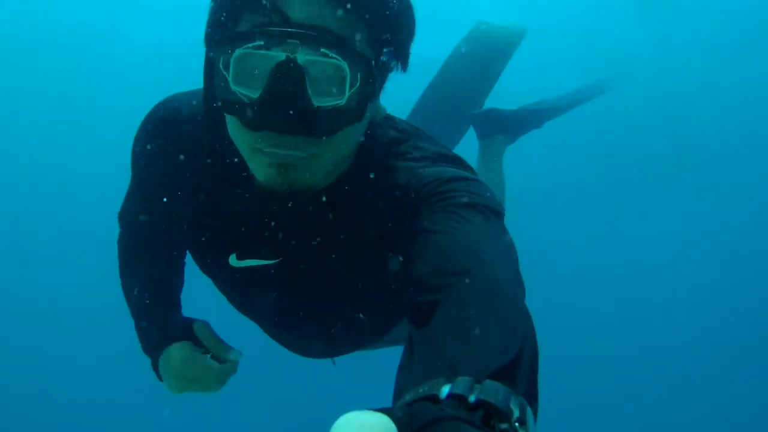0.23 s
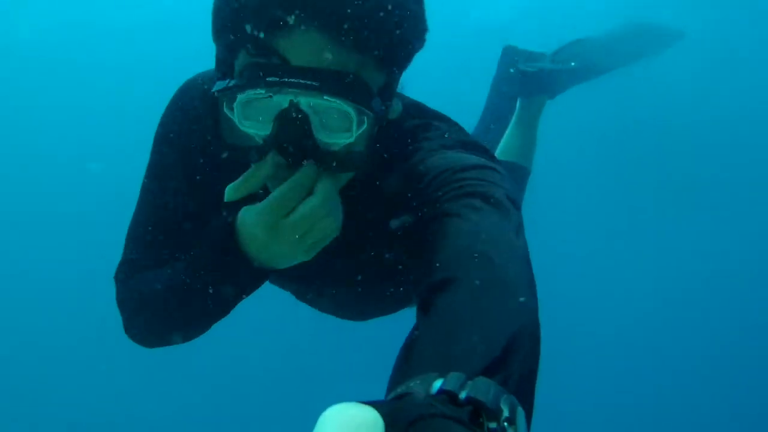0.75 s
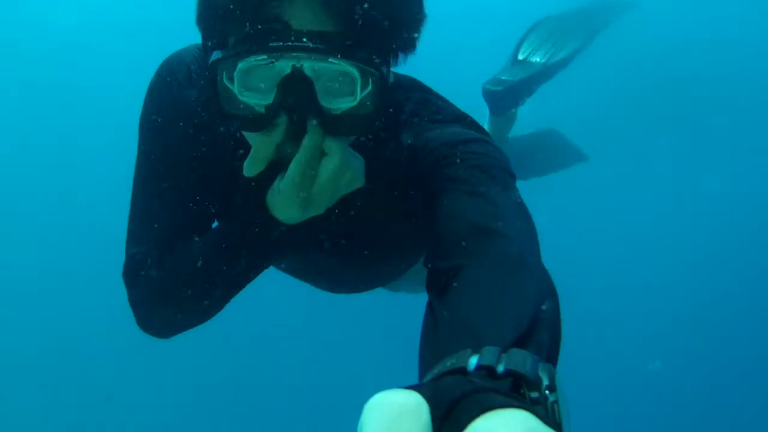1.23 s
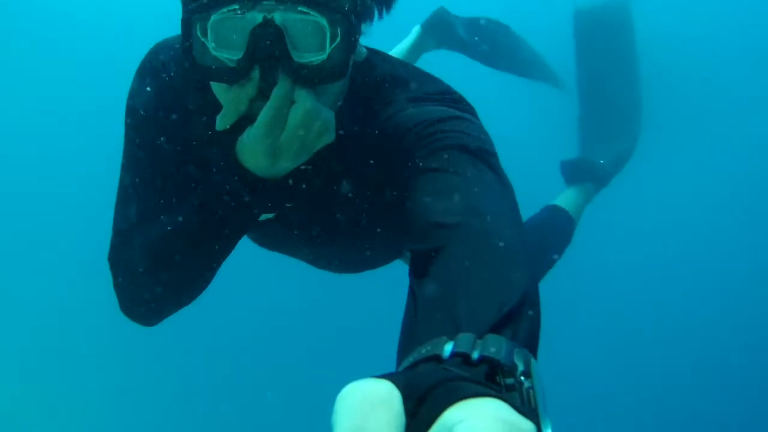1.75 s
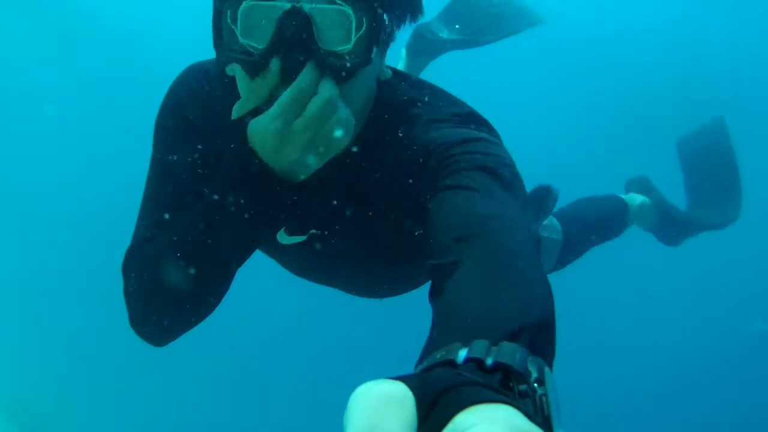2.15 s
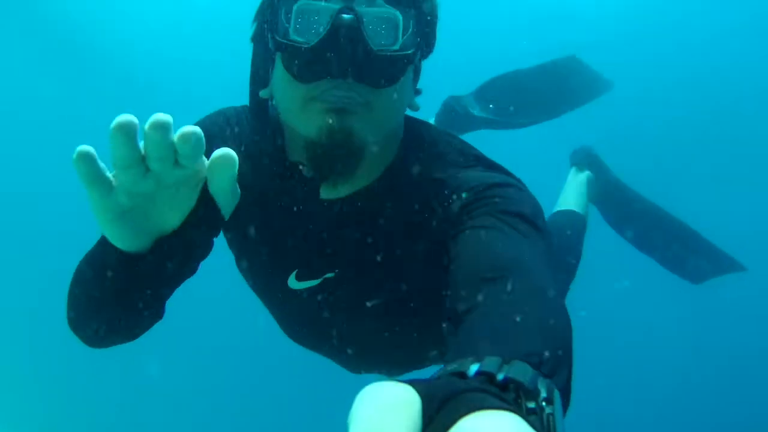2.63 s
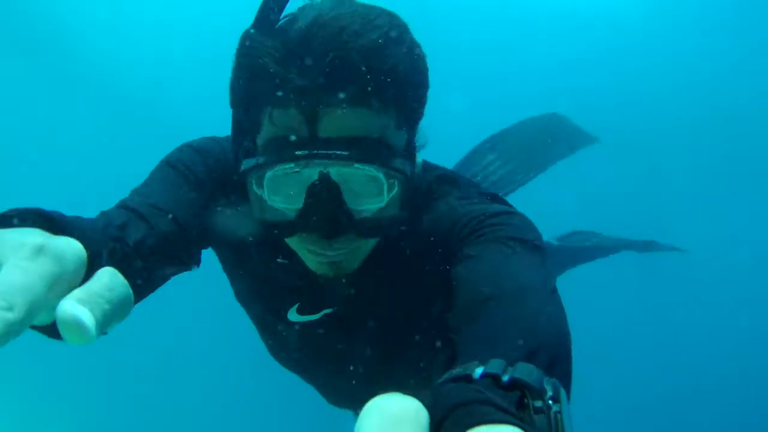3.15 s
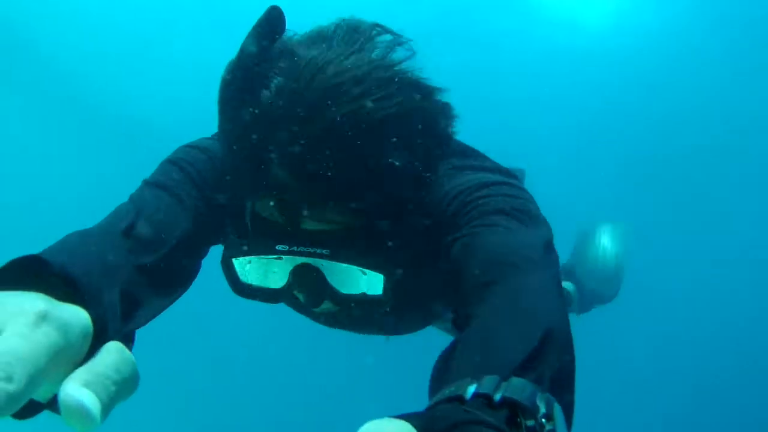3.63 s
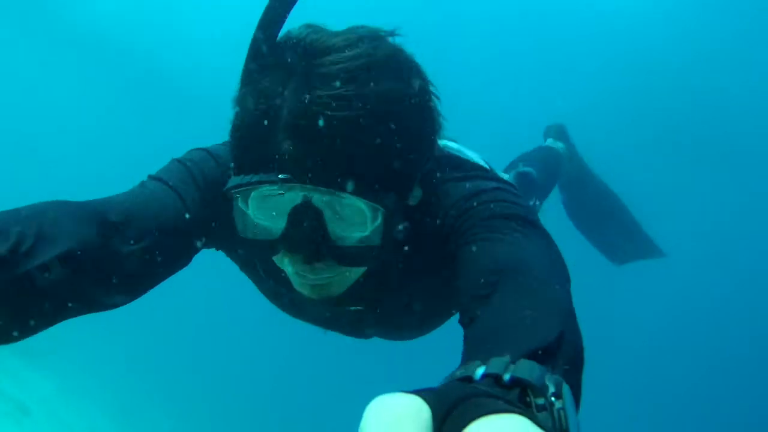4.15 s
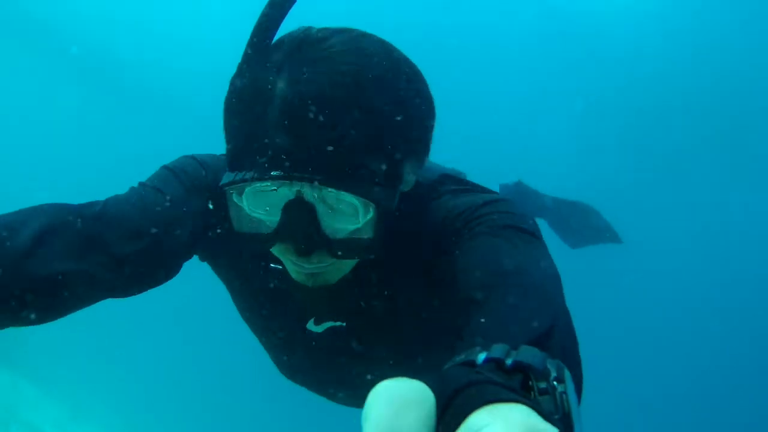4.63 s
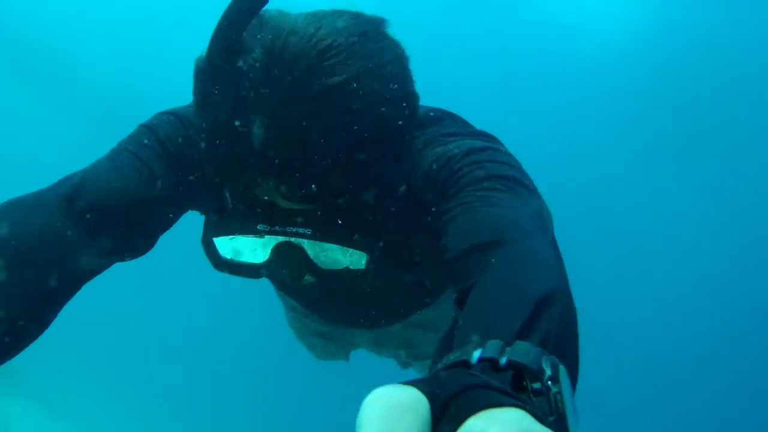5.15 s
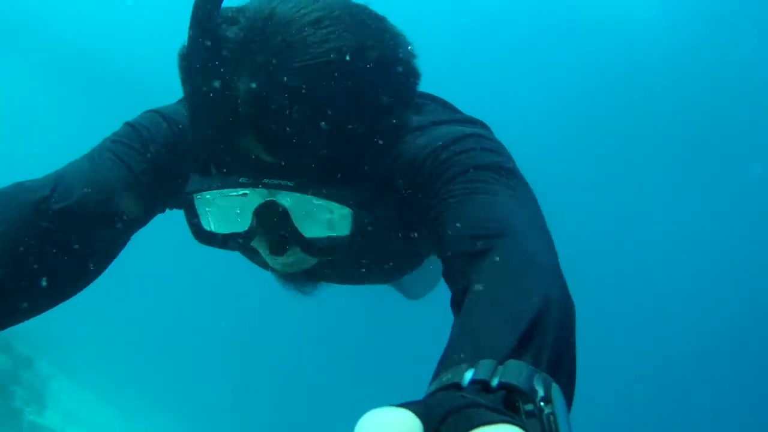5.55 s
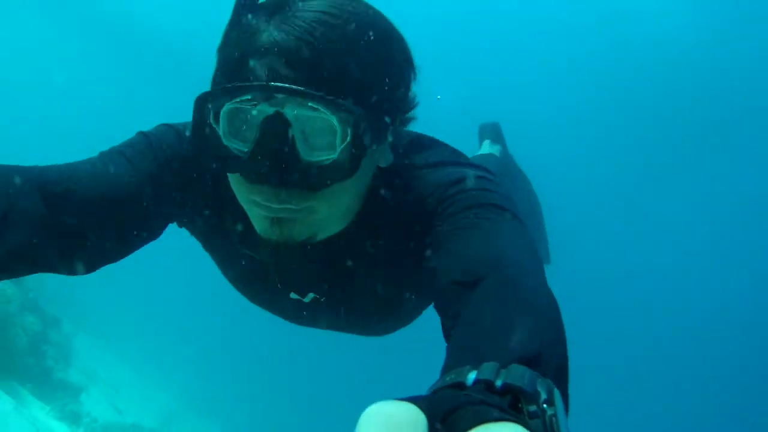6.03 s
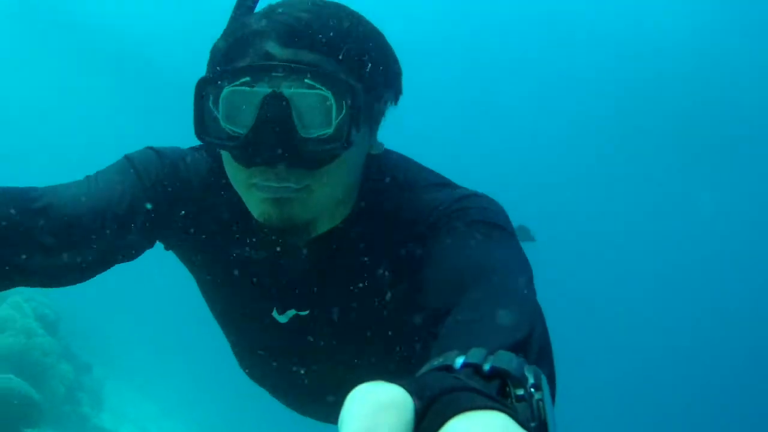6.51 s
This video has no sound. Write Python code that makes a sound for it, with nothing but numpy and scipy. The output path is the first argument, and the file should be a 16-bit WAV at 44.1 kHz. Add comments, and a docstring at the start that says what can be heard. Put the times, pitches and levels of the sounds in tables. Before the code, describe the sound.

Underwater, a microphone sealed in a hollow camera case picks up a swimming freediver. A deep, uneven rumble runs throughout, with slow sway and soft throbbing thumps; over it lie muffled lapping, fine flickering fizz, smooth hiss and a very faint high whine. Sharp dry snaps and tiny bubble blips scatter irregularly, with brighter snaps near 0.5 and 3.6 s. From 0.8 to 1.9 s, short sloshes and cushioned knocks accompany the hand. Around 2.05 s a tiny falling gurgle precedes knocks and a thump at 2.3 s. Flow swells from 2.5 to 4 s, with sloshes at 3.0 and 3.8 s, then eases. At 5.7 s it surges again; a second gurgle at 5.8 s leads into the loudest dull knock at 5.9 s, further knocks and a brief grip creak until about 6.2 s. The rumble then eases, with a few crisp ticks to the end near 7 s.

```python
"""A low watery rumble under a fine fizz, a smooth hiss and a faint whine: a camera in a waterproof
housing, held by a freediver finning through open water. Eddies (filtered noise and short pulses) buffet
the case; sloshes, lapping and microbubbles (grains through resonators) burble and fizz. Knocks (damped
sines), sharp snaps, probably reef shrimp (filtered spikes), and tiny bubbles (chirped sines) tick over
this; trapped air gurgles twice (falling harmonics) and the hand rubs the grip once (stick-slip pulses)."""
import sys
import numpy as np
from scipy import signal
from scipy.fft import rfft, irfft
from scipy.io import wavfile
from scipy.ndimage import uniform_filter1d

SR = 44100
rng = np.random.default_rng(int(sys.argv[2]) if len(sys.argv) > 2 else 0)


def waveform_to_disk(signal):
    """Save audio, clipped to [-1, 1], as 16-bit WAV at the path in sys.argv[1]."""
    frames = np.transpose(np.atleast_2d(signal))
    scaled = np.clip(frames, -1, 1) * 32767
    samples = np.round(scaled).astype(np.int16)
    wavfile.write(sys.argv[1], SR, samples)


N = 298998
T = np.arange(N) / SR  # time of each sample, s


def undb(db):
    """Level as a logarithm: decibels to amplitude gain."""
    return 10 ** (np.asarray(db) / 20)


def unit(x):
    """Normalisation: scale to standard deviation 1."""
    return x / np.std(x)


def curves(table):
    """Linear interpolation: each column after the first as a line through time."""
    s, *columns = np.transpose(table)
    return [np.interp(T, s, column) for column in columns]


def add(out, s, sound):
    """Superposition: mix a sound in at a given time."""
    i = int(s * SR)
    out[i:i + len(sound)] += sound[:max(N - i, 0)]


def response(points, size=16384):
    """Minimum phase: the causal impulse response of a spectrum, by folding its cepstrum."""
    hz, db = np.transpose(points)
    f = np.maximum(np.fft.rfftfreq(size, 1 / SR), 1)
    gain = undb(np.interp(np.log(f), np.log(hz), db))
    gain = gain * np.minimum(hz[-1] / f, 1) ** 2  # a further 12 dB per octave past the last point
    cepstrum = irfft(np.log(gain))
    cepstrum[1:size // 2] *= 2
    cepstrum[size // 2 + 1:] = 0
    return irfft(np.exp(rfft(cepstrum)))


def colour(x, points):
    """Linear filtering: pass a sound through a spectrum, then scale it to rms 1."""
    return unit(signal.fftconvolve(x, response(points))[:N])


def resonate(x, hz, q):
    """Resonance: a single mode driven by x, with gain 1 at its pitch."""
    return signal.lfilter(*signal.iirpeak(hz, q, fs=SR), x)


# resonances of the case and the air inside it: pitch_hz [Hz], width_hz [Hz], lift_db [dB, each alone]
HOUSING_MODES = [(516.5, 47.5, 7.5), (557, 47.4, 6.5), (826, 30, 5), (1096, 83, 13), (1628, 56, 15),
                 (1904, 100, 11)]


def housing(x):
    """Sympathetic resonance: the case and its air ring along with whatever reaches them."""
    for hz, width_hz, lift_db in HOUSING_MODES:
        x = x + (undb(lift_db) - 1) * resonate(x, hz, hz / width_hz)
    return x


def walk(rate):
    """Random drift: smoothed random steps, so many a second, with spread near 1."""
    k = int(SR / rate)
    steps = np.repeat(rng.standard_normal(N // k + 1), k)
    return unit(uniform_filter1d(steps, k)[:N])


def grains(rate, spread_db):
    """Poisson-like shot noise: random tiny impulses, so many a second, most weak and a few strong."""
    sizes = undb(spread_db * np.minimum(rng.exponential(size=N), 5))
    struck = rng.random(N) < rate / SR
    return unit(struck * sizes * rng.choice([-1, 1], N))


def steady(x, hold_s):
    """Gain levelling: hold a random sound at rms 1 over a short time."""
    return x / np.sqrt(uniform_filter1d(x ** 2, int(hold_s * SR)))


def eddy_pressure(points, hold_s):
    """Turbulent pressure: coloured noise, held at even strength over a few turns."""
    return steady(colour(rng.standard_normal(N), points), hold_s)


def swells(table, rise=0.24):
    """Energy addition: events that build up for a share (rise) of their length, then fade."""
    power = 0
    for s, length, db in table:
        power = power + np.interp(T, [s, s + rise * length, s + length], [0, undb(db), 0]) ** 2
    return np.sqrt(power)


# speed of the water past the case, as the level of the sway it causes: time_s [s], level_db [dB]
FLOW_SPEED = [(0, -40.5), (.55, -38), (.8, -43), (1.9, -41.5), (2.2, -35.5), (2.7, -32), (3.55, -30.5),
              (4.3, -34.5), (5.3, -37.5), (5.75, -32), (6.2, -31.5), (6.6, -36.5)]
# spectra of slow sway and of faster buffeting: frequency_hz [Hz], density_db [dB per Hz, relative]
SWAY_SPECTRUM = [(4, -19), (9, 0), (18, 7.5), (25, -9), (33, -6), (48, -11.5), (65, -24.5), (100, -53)]
BUFFET_SPECTRUM = [(30, -34), (55, -4), (75, 1.5), (98, 2), (120, -5.5), (150, -13.5), (200, -33.5),
                   (350, -62)]
# trains of small eddies: start_s [s], length_s [s], level_db [dB, at the height]
EDDY_TRAINS = [(.25, 0.19, -47.5), (.66, .2, -46.5), (1.2, 0.28, -46.5), (3.1, 0.37, -46),
               (3.97, 0.22, -41), (5.19, 0.083, -45), (5.38, 0.13, -45)]


def rumble(buffet_db=-53.5, buffet_law=0.72, surge_db=4.0, eddy_hz=91, eddy_width_hz=31):
    """Flow noise: the stream sways and buffets the case in surges; eddy trains make it throb and fade."""
    flow_db = curves(FLOW_SPEED)[0]
    sway = eddy_pressure(SWAY_SPECTRUM, hold_s=0.23) * undb(flow_db)
    # buffet_db holds at the mean flow before the surges; buffet_law is dB per dB of flow
    level_db = buffet_db + buffet_law * (flow_db - flow_db.mean()) + surge_db * walk(14)
    buffet = eddy_pressure(BUFFET_SPECTRUM, hold_s=.07) * undb(level_db)
    throb = resonate(eddy_pressure(BUFFET_SPECTRUM, hold_s=0.052), eddy_hz, eddy_hz / eddy_width_hz)
    return sway + buffet + steady(throb, hold_s=0.061) * swells(EDDY_TRAINS)


def microbubbles(q=6.6, count=14):
    """Bubble resonance: many sizes pop independently, each ringing a few cycles at its own pitch."""
    fizz = 0
    for hz in np.geomspace(1500, 9500, count):
        pops = grains(rate=160, spread_db=2.5)
        fizz = fizz + unit(resonate(pops, hz, q)) * np.sqrt(hz)
    return fizz


# fizz on the case wall, before its flicker: time_s [s], level_db [dB]
FIZZ_LEVEL = [(0.0, -61), (0.49, -74.5), (0.87, -74.5), (1.7, -66.5), (2.4, -73), (3.19, -64.5),
              (4.66, -72), (4.97, -67.5), (5.36, -74), (6.27, -70), (6.44, -76), (6.78, -70.5)]
# spectra of lapping and of fizz: frequency_hz [Hz], density_db [dB per Hz, relative]
MURMUR_SPECTRUM = [(90, -11.5), (150, 0), (220, -1.5), (320, -3.5), (400, -7), (520, -4), (600, -8.5),
                   (700, -16), (1000, -23), (1400, -29.5), (2500, -49.5)]
FIZZ_SPECTRUM = [(900, -24), (1450, -13), (1900, -3.5), (2250, 9), (2550, -7), (2900, -0.5), (3400, -8.5),
                 (4600, -14), (6000, -10), (7500, -18), (12000, -28)]


def wash(murmur_db=-60, murmur_law=0.52, flutter_db=2.0, flicker_db=2.92):
    """Shot noise in a cavity: water laps the hollow case in lumps, and microbubbles fizz on its wall."""
    fizz_db = curves(FIZZ_LEVEL)[0]
    lapping = unit(housing(colour(grains(rate=600, spread_db=3.), MURMUR_SPECTRUM)))
    fizz = unit(housing(colour(microbubbles(), FIZZ_SPECTRUM)))
    # murmur_db holds at the mean fizz before the flutter; murmur_law is dB per dB of fizz
    lapping_db = murmur_db + murmur_law * (fizz_db - fizz_db.mean()) + flutter_db * walk(28)
    return lapping * undb(lapping_db) + fizz * undb(fizz_db + flicker_db * walk(60))


# spectrum of a snap: frequency_hz [Hz], density_db [dB per Hz, relative]
SNAP_SPECTRUM = [(700, -18), (1400, -25), (1900, 0.5), (2400, 10.5), (3100, 3), (3800, 4.5), (4900, -6),
                 (6000, 2), (7500, -14), (9200, -18), (11000, -29)]


def far_snaps(level_db=-75):
    """Incoherent summation: many snaps, too far off to stand out singly."""
    ticks = grains(rate=120, spread_db=2.6)
    return undb(level_db) * unit(housing(colour(ticks, SNAP_SPECTRUM)))


# steady electronic tones: pitch_hz [Hz], level_db [dB rms]
WHINE_TONES = [(5997, -86.5), (11994, -97.5)]
# spectrum of the microphone hiss: frequency_hz [Hz], density_db [dB per Hz, relative]
HISS_SPECTRUM = [(200, 9.5), (3000, 5.5), (5000, -0.5), (6000, 0.5), (7600, -2.5), (9200, 2), (11000, -2.5),
                 (15000, -3)]


def electronics(hiss_db=-71):
    """Self-noise: smooth microphone hiss and a thin steady whine of pure tones."""
    whine = sum(np.sqrt(2) * undb(db) * np.sin(2 * np.pi * hz * T) for hz, db in WHINE_TONES)
    return whine + undb(hiss_db) * colour(rng.standard_normal(N), HISS_SPECTRUM)


# water sloshing round the moving hand and arm: start_s [s], length_s [s], level_db [dB, at the height]
SLOSH_EVENTS = [(.05, 0.16, -61), (.84, 0.16, -55.5), (1.04, 0.29, -57), (1.38, 0.16, -56.5),
                (1.7, 0.16, -57.5), (2.27, 0.12, -56.5), (3.02, 0.29, -54), (3.82, 0.17, -57.5)]


def sloshes(low_hz=165, high_hz=512, q=4.2, crackle_db=-12, count=6):
    """Bubble resonance: stirred air pockets of several sizes burble a few cycles; the smallest crackle."""
    burble = 0
    for hz in np.geomspace(low_hz, high_hz, count):
        burble = burble + unit(resonate(grains(rate=120, spread_db=4.0), hz, q))
    burble = unit(housing(colour(burble, MURMUR_SPECTRUM)))
    crackle = unit(housing(colour(grains(rate=200, spread_db=2.5), FIZZ_SPECTRUM)))
    return (burble + undb(crackle_db) * crackle) * swells(SLOSH_EVENTS)


# knocks on the case: start_s [s], level_db [dB, peak of the thud], pitch_hz [Hz, lower for a softer touch],
# edge_db [dB, peak of the sharp edge relative to the thud]
KNOCK_EVENTS = [(0.074, -49, 540, 0), (0.172, -48, 570, -5), (.856, -48.5, 560, -23),
                (0.968, -47.5, 493, -23), (1.052, -47.5, 470, -25), (1.105, -43.5, 275, -20),
                (1.116, -43, 350, -26), (1.245, -48, 424, -28), (1.39, -38, 250, -25),
                (1.57, -44.5, 435, -25), (2.135, -43.5, 420, -25), (2.165, -40.5, 490, -20),
                (2.262, -35, 340, -14.5), (2.264, -42.5, 740, -13), (2.305, -44.5, 490, -25),
                (3.079, -47, 473, -13), (3.655, -43, 333, -12), (3.915, -42.5, 182, -8),
                (4.393, -39.5, 494, -29), (5.466, -47, 490, -31), (5.661, -37, 334, -23),
                (5.784, -31, 198, -29), (5.804, -37, 258, -32), (5.9132, -21.5, 372, -46),
                (6.028, -31, 380, -26), (6.144, -34, 234, -23), (6.443, -45.5, 500, -30)]


def knocks(cycles=0.31, edge_hz=1130, grip_hz=296, grip_width_hz=39, grip_lift_db=4.5, size=4096):
    """Damped impact: water cushions each knock within a few cycles; only grip and hollow case ring on."""
    out, t = np.zeros(N), T[:size]
    for s, peak_db, pitch_hz, edge_db in KNOCK_EVENTS:
        for db, hz in (peak_db, pitch_hz), (peak_db + edge_db, edge_hz):
            age = hz * t / cycles
            push = age ** 4 * np.exp(-age) * np.sin(2 * np.pi * hz * t)
            grip_ring = (undb(grip_lift_db) - 1) * resonate(push, grip_hz, grip_hz / grip_width_hz)
            thud = housing(push + grip_ring)
            add(out, s, thud * undb(db) / np.abs(thud).max())
    return out


# near snaps: start_s [s], level_db [dB, peak before the wall's treble loss], tilt_db [dB per octave]
NEAR_SNAPS = [(.077, -47.5, -3), (.1303, -48.5, 1), (.1495, -41.5, -8.5), (.1755, -48, -10),
              (.276, -46.5, -5), (0.3276, -37, 5), (0.461, -31, 3), (.53, -45.5, 2), (0.7154, -49.5, -8),
              (.859, -44, 2), (.8964, -52, -7), (.917, -44, 1), (.926, -41.5, 7), (1.1099, -51, -0.5),
              (1.251, -46, 3), (1.4325, -43, -16), (1.4805, -47, -11), (2.0603, -49, 2), (2.1145, -43, 0.5),
              (3.043, -46, -6), (3.0815, -49, -2), (3.094, -45, -8), (3.155, -39.5, -12),
              (3.1636, -44.5, -1), (3.3085, -46, -3), (3.312, -35.5, -2), (3.6, -30, 5), (3.907, -44.5, -2),
              (3.9154, -40.5, -16.5), (3.9203, -35, -15), (4.067, -41, -9), (4.557, -42, 1),
              (5.182, -45, 10), (5.187, -46, 9), (5.4454, -41, -1.5), (5.5747, -48, 1), (5.6406, -36.5, -2),
              (5.7253, -42.5, 2.5), (5.759, -41.5, -3), (5.826, -46, 3), (6.0153, -39, 1.5),
              (6.36, -41.5, 0), (6.6278, -36.5, 3), (6.674, -36, -2), (6.762, -38.5, -6)]


def snaps(echo_db=-16, surface_lag_s=0.0048, rattle_db=-16, rattle_s=0.0013, scatter_db=-37,
          scatter_s=0.013, wall_top_hz=10400, size=2048):
    """Impulse response: a pressure spike ticks the case; rattle, scatter and a surface echo trail it."""
    out, t = np.zeros(N), T[:size]
    trail = undb(rattle_db) * np.exp(-t / rattle_s) + undb(scatter_db) * np.exp(-t / scatter_s)
    for s, db, tilt_db in NEAR_SNAPS:
        spike = trail * rng.standard_normal(size)
        spike[0] = 1
        lag_s = surface_lag_s * rng.uniform(.7, 1.3)
        spike[int(lag_s * SR)] -= undb(echo_db)  # the surface inverts it
        tilted = [(hz, level + tilt_db * np.log2(hz)) for hz, level in SNAP_SPECTRUM]
        tick = housing(signal.fftconvolve(spike, response(tilted, size=size))[:size])
        add(out, s, tick * undb(db) / np.abs(tick).max())
    # the case wall passes little of a snap above wall_top_hz
    return signal.sosfilt(signal.butter(4, wall_top_hz, fs=SR, output="sos"), out)


# tiny bubbles: start_s [s], level_db [dB, before attack and decay], pitch_hz [Hz, at the start, before wobble]
TINY_BUBBLES = [(.1492, -41.5, 2200), (0.1745, -54, 2290), (.338, -48, 2070), (0.714, -47.5, 2155),
                (2.057, -52.5, 1640), (4.262, -42.5, 1900), (4.906, -48, 1890), (5.183, -44.5, 1900),
                (6.177, -48, 2130)]


def bubbles(attack_s=0.0005, decay_s=0.006, rise=0.93, wobble=0.022, size=2048):
    """Volume pulsation: pinch-off jolts a bubble, which rings down wobbling, its pitch rising slightly."""
    out, t, shape = np.zeros(N), T[:size], 1 + wobble * walk(700)
    ring = (1 - np.exp(-t / attack_s)) * np.exp(-t / decay_s)
    for s, db, hz in TINY_BUBBLES:
        i = int(s * SR)
        pitch = hz * (1 + rise * t) * shape[i:i + size]  # rise is a share per second
        phase = 2 * np.pi * np.cumsum(pitch) / SR
        add(out, s, undb(db) * ring * np.sin(phase))
    return out


# single eddies that thump the case: centre_s [s], level_db [dB, height of the envelope]
THUMP_EVENTS = [(0.272, -36), (0.304, -36), (0.37, -37), (.681, -38), (1.066, -32), (1.11, -38),
                (1.345, -34.5), (1.853, -39), (2.274, -29), (2.466, -35.5), (2.579, -36), (3.065, -31.5),
                (3.118, -36), (3.16, -34.5), (3.397, -30), (3.494, -32), (3.668, -28.5), (3.986, -35.5),
                (4.047, -37.5), (4.118, -37.5), (4.907, -31), (5.452, -37.5), (5.679, -28.5),
                (5.962, -32.5), (6.353, -37), (6.675, -31.5)]


def thumps(thump_hz=84, cycles=0.72):
    """Pressure pulse: an eddy swells against the case and leaves it within a cycle or two."""
    out, t = np.zeros(N), T[:4096] - T[2048]  # time from the centre
    pulse = np.exp(-(thump_hz * t / cycles) ** 2) * np.sin(2 * np.pi * thump_hz * t)
    for s, db in THUMP_EVENTS:
        add(out, s + t[0], undb(db) * pulse)
    return out


# gurgles: start_s [s], length_s [s], level_db [dB, fundamental before the housing],
# start_pitch_hz [Hz], end_pitch_hz [Hz], overtone_db [dB, also scales the froth]
GURGLE_EVENTS = [(2.048, 0.0505, -34.5, 193.8, 93.3, -13), (5.811, .088, -33.5, 212.6, 112.6, -25)]
# spectrum of the grip: frequency_hz [Hz], density_db [dB per Hz, relative]
GRIP_SPECTRUM = [(120, -8), (200, 1), (255, 3), (320, -9), (450, 4.5), (530, -1.5), (600, -4.5), (690, -16),
                 (820, -15.5), (950, -31), (1400, -38.5), (2500, -44)]


def gurgles(wobble=0.04, fall_db=-7, spray_db=-44, count=4):
    """Relaxation oscillation: air flutters through a gap, sinking in pitch and spitting froth each cycle."""
    out, unsteady = np.zeros(N), 1 + wobble * walk(220)
    froth = colour(rng.standard_normal(N), GRIP_SPECTRUM)
    froth = undb(spray_db) * (froth + 0.31 * colour(rng.standard_normal(N), FIZZ_SPECTRUM))
    for s, length, db, start_hz, end_hz, overtone_db in GURGLE_EVENTS:
        u = np.linspace(0, 1, int(length * SR))
        pitch = (start_hz + (end_hz - start_hz) * u) * unsteady[:len(u)]
        phase = 2 * np.pi * np.cumsum(pitch) / SR
        overtones = sum(undb(fall_db * k) * np.sin((k + 2) * phase) for k in range(count))
        rasp = undb(db) * overtones + froth[:len(u)] * (1 + np.cos(phase))
        swell = np.sin(np.pi * u ** 0.97)
        add(out, s, swell * (undb(db) * np.sin(phase) + undb(overtone_db) * rasp))
    return housing(out)


# the hand slips once on the grip, pressing harder twice: time_s [s], level_db [dB, rms of the creak]
RUB_PRESSURE = [(5.914, -90), (5.938, -48), (6.036, -43.5), (6.096, -50), (6.139, -43), (6.165, -51.5),
                (6.3, -100)]


def rub(slip_hz=128.4, jitter=.06, rasp_db=-3, count=64):
    """Stick-slip friction: skin creaks on the grip at a nearly even rate, over a finer rasp."""
    slips, chance = np.zeros(N), rng.standard_normal((count, 2))
    times = RUB_PRESSURE[0][0] + np.cumsum(1 + jitter * chance[:, 0]) / slip_hz
    for s, db in zip(times, 2 * chance[:, 1]):
        add(slips, s, undb([db]))
    creak = unit(housing(colour(slips, GRIP_SPECTRUM)))
    creak = creak * np.sqrt(count / slip_hz / T[-1])  # rms 1 while it lasts
    rasp = unit(housing(colour(grains(rate=1400, spread_db=2.4), GRIP_SPECTRUM)))
    return (creak + undb(rasp_db) * rasp) * undb(curves(RUB_PRESSURE)[0])


def scene():
    """Superposition: everything reaches the one microphone inside the case."""
    water = rumble() + wash() + sloshes() + thumps()
    life_and_air = far_snaps() + snaps() + bubbles() + gurgles()
    handling = knocks() + rub()
    return (water + life_and_air + handling + electronics())[None]


def record(dry, top_hz=15000):
    """Band limiting: the camera cuts the top of the treble; both ends fade over a few milliseconds."""
    fade = np.minimum(np.minimum(T, T[-1] - T) / .008, 1)
    return signal.sosfilt(signal.ellip(10, .1, 80, top_hz, fs=SR, output="sos"), dry * fade)


dry = scene()
out = record(dry)
waveform_to_disk(out)
```